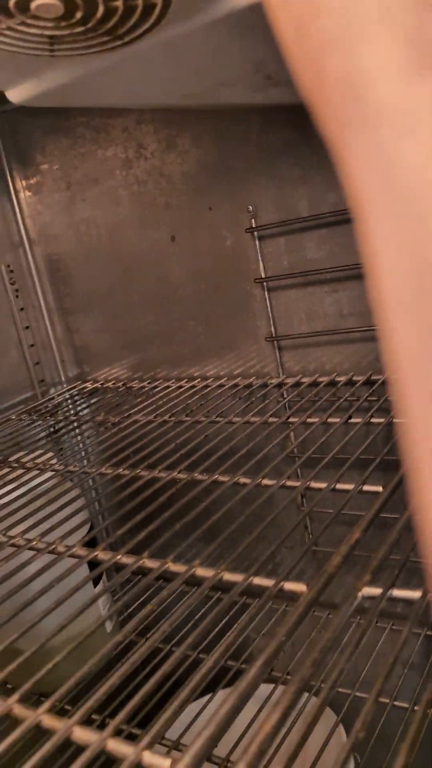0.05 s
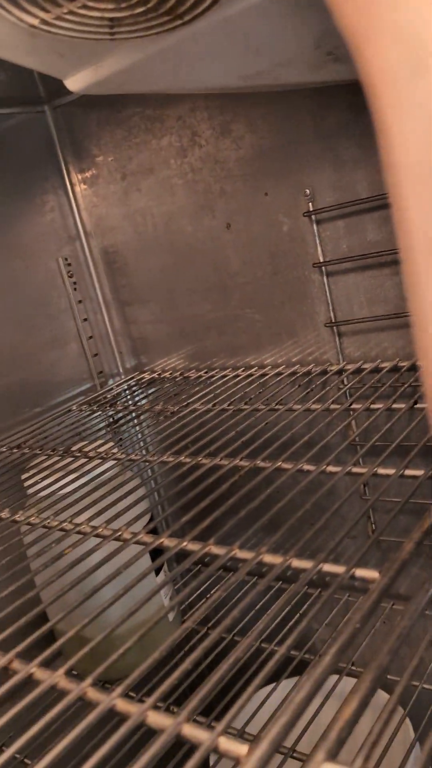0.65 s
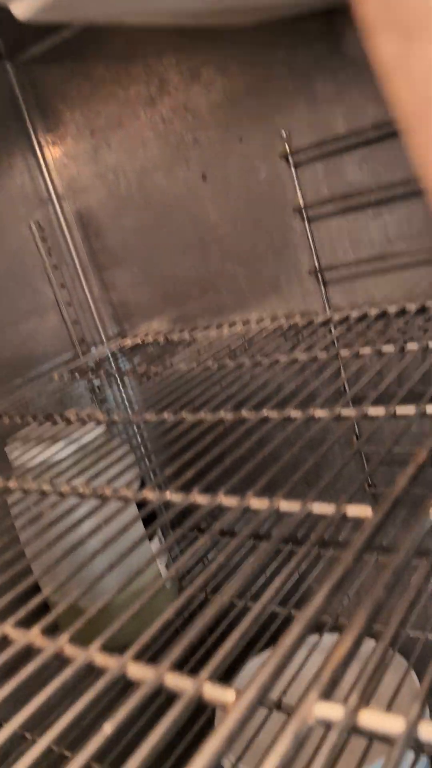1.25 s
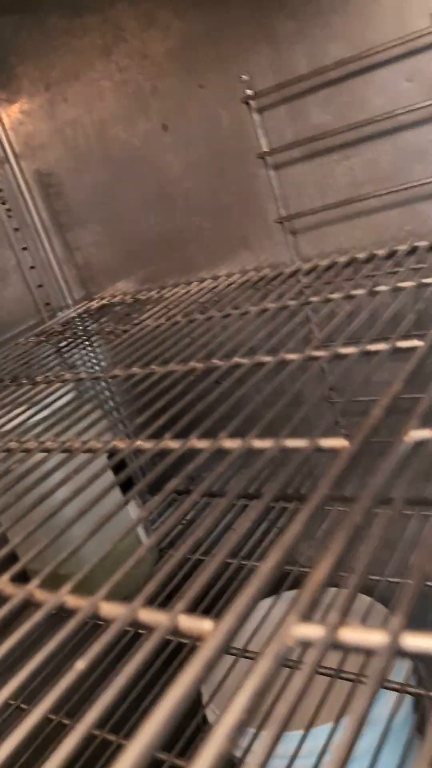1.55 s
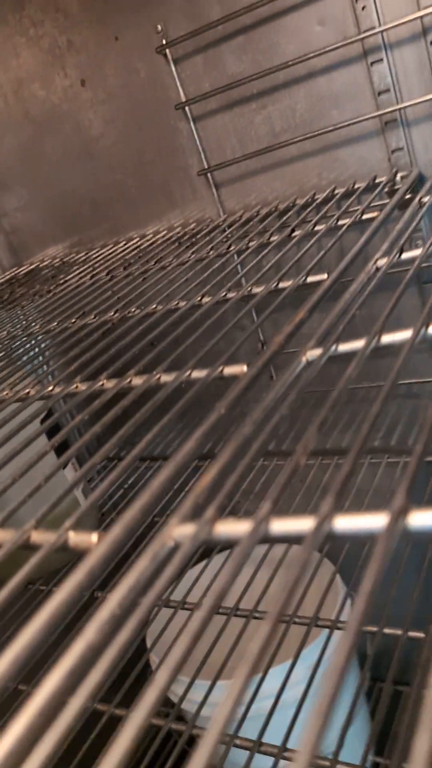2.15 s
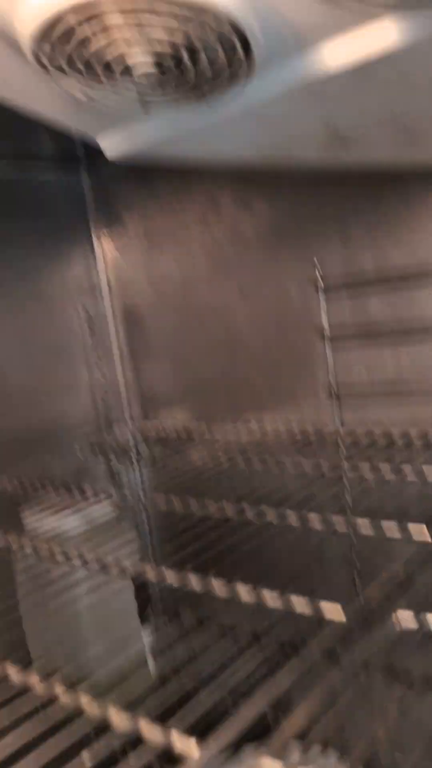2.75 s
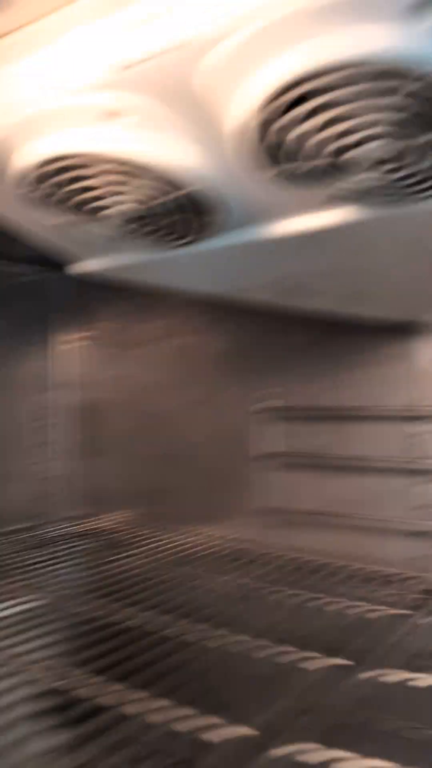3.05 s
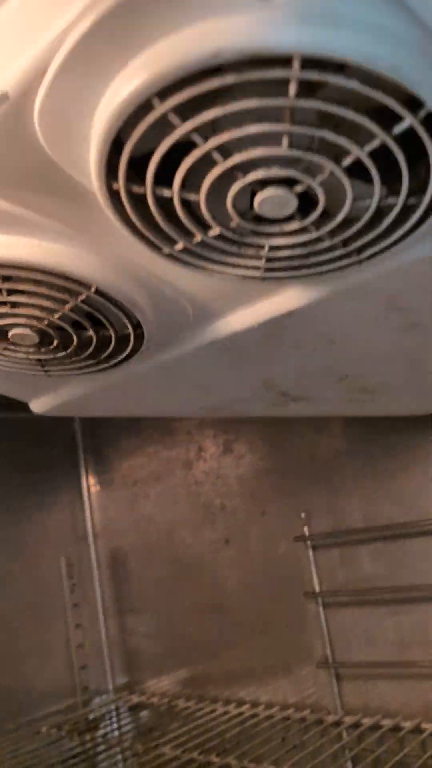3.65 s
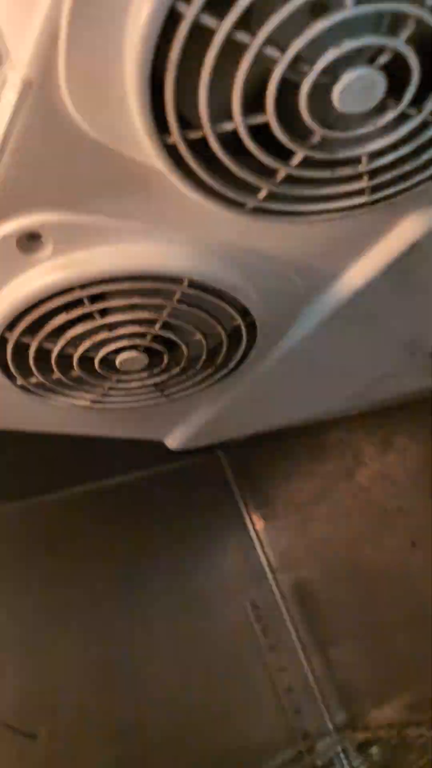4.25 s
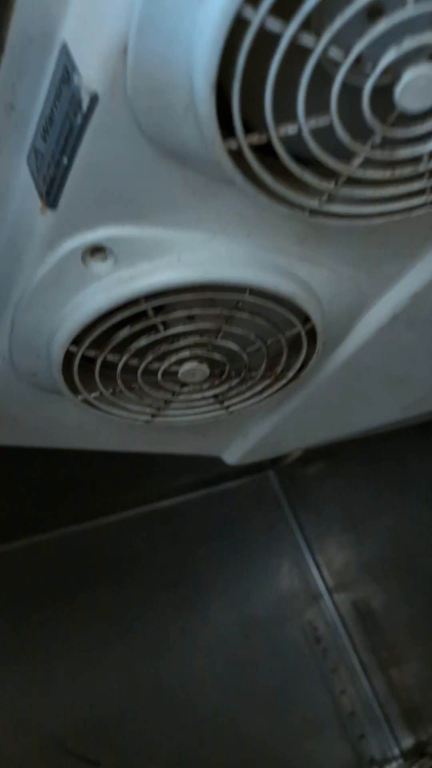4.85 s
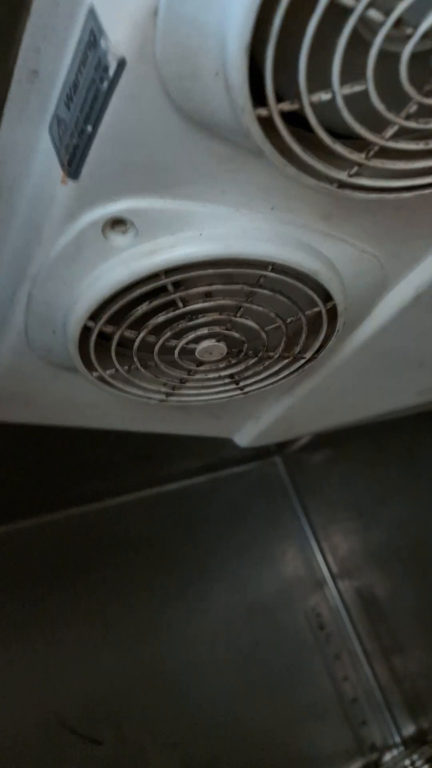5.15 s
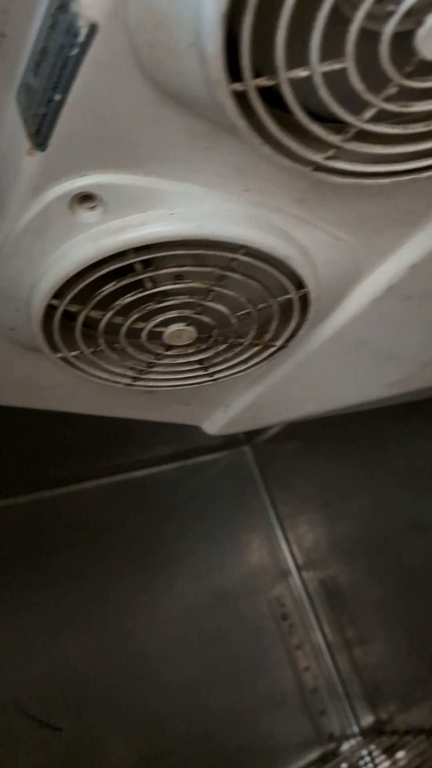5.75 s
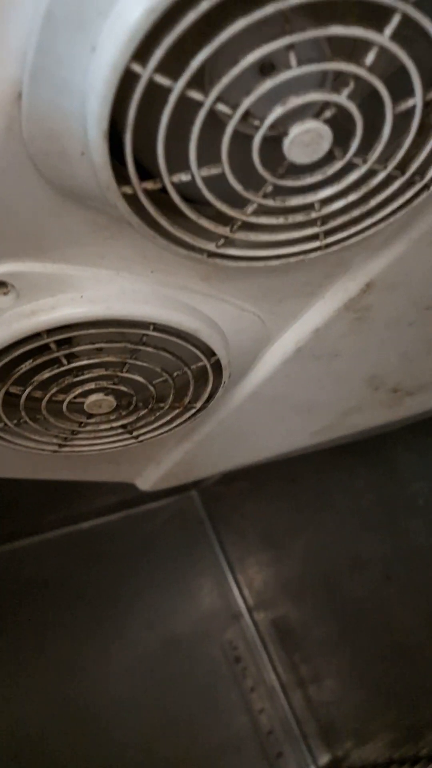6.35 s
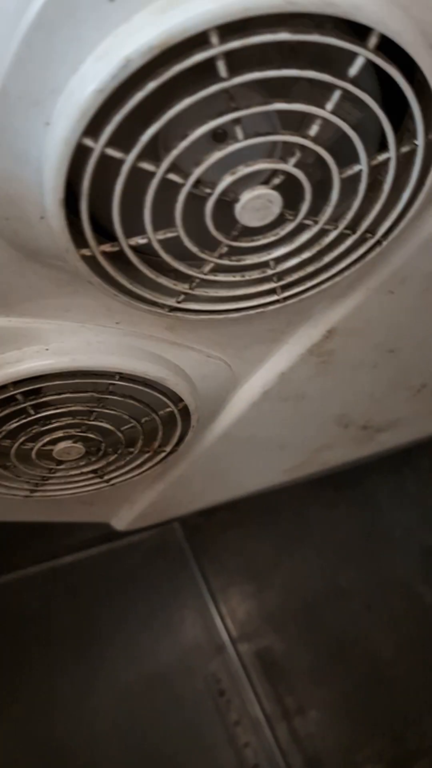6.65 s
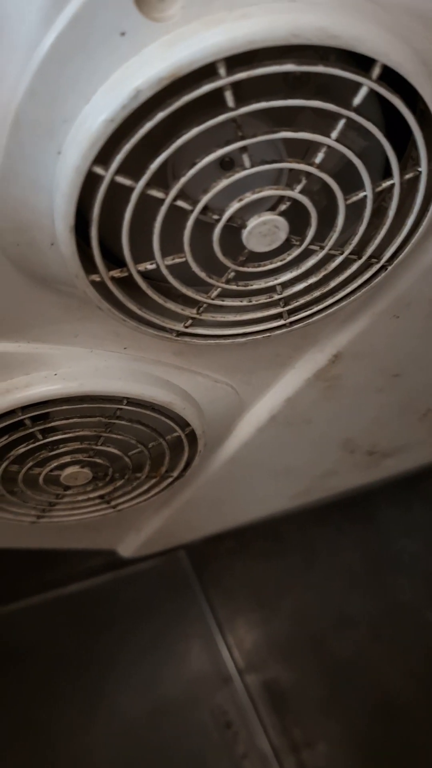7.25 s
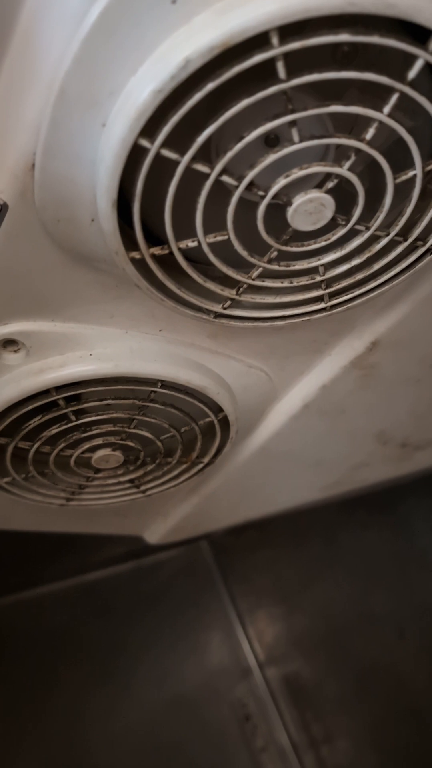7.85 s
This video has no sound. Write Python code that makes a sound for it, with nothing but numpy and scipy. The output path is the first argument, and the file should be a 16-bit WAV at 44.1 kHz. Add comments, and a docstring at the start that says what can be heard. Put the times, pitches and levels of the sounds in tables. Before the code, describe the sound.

A commercial freezer drones with a steady, gently pulsing hum, the microphone inside its small metal cabinet. One sharp click comes early, then soft brushes of a hand and light ticks. Then the fan starts with a gust, a short groan and a few dull knocks from the housing. It settles into a louder rush of air with a throbbing rumble and the fluttering hiss of its rotor brushing the casing.

```python
"""Inside a running steel commercial freezer. Its motors hum and beat against each other over a soft
wash of air. A sharp click and a few lighter ticks ring off the walls, among faint swishes of a hand.
Then a fan cuts in with a surge of air and some dull knocks: its unbalanced rotor shakes the housing
at the turning rate and brushes it once a turn, which makes a fluttering hiss."""
import sys
import numpy as np
from scipy import signal
from scipy.fft import rfft, irfft, next_fast_len
from scipy.io import wavfile

SR = 44100
rng = np.random.default_rng(int(sys.argv[2]) if len(sys.argv) > 2 else 0)


def generate_wav(sig):
    """Save sig (samples, or channels by samples) to the path in sys.argv[1] as 16-bit PCM at SR."""
    pcm = np.round(np.clip(np.atleast_2d(sig).T, -1, 1) * 32767).astype(np.int16)
    wavfile.write(sys.argv[1], SR, pcm)


N = 357205

# Levels are relative: each layer has its own trim. Balance is left minus right.
# Colours of the air bed: wash, treble, rumble, thin hiss (frequency [Hz], level [dB])
WASH_SPECTRUM = [(30, -102), (80, -79.5), (112, -68.5), (150, -75.5), (200, -76), (250, -69.5),
                 (300, -75.5), (350, -80.5), (410, -79), (640, -86.5), (800, -90), (1900, -100),
                 (3000, -110), (8000, -150)]
TREBLE_SPECTRUM = [(1200, -120), (2900, -105), (3900, -111), (4800, -109), (6200, -114), (7000, -126),
                   (10000, -128), (14500, -130), (16000, -136)]
RUMBLE_SPECTRUM = [(25, -102), (38, -94), (47, -74), (56, -71), (75, -76), (110, -103), (400, -170)]
THIN_HISS_SPECTRUM = [(7000, -160), (10000, -126), (10750, -109), (11800, -115), (13000, -123),
                      (16000, -131)]
# Level rides of the rumble and the air's treble (time [s], level [dB])
RUMBLE_RIDE = [(0.0, -64), (0.53, -55), (2.03, -54), (2.18, -65), (2.55, -66.5), (3.97, -43), (4.4, -51),
               (4.8, -47)]
TREBLE_RIDE = [(0.5, -69.5), (2.55, -73), (2.9, -69), (3.58, -75), (4.06, -70.5), (4.7, -75)]
# Swells of thin high hiss (time [s], length [s], level [dB])
THIN_HISS_SWELLS = [(1.254, .9, -4.5), (3.802, 0.8, 1)]
# Stereo width of the air (frequency [Hz], left-right correlation [ratio])
AIR_CORRELATION = [(108, 1), (130, 0.7), (290, 0.83), (640, 0.24), (1300, -0.07), (3000, 0), (15000, 0.4)]
# Panning of the air bed, and of the fan's air and the swishes (frequency [Hz], balance [dB])
BED_PAN = [(100, 6), (380, -2), (700, -0.5), (1300, -5.5), (2400, -3.5), (4400, -2.5), (9000, 3.5)]
DRAUGHT_PAN = [(60, -3), (200, 2.5), (380, 1), (700, -1.5), (1300, -4.5), (2400, 3), (8000, -19),
               (15000, -10.5)]

# Steady tones of the motors and of the fan (frequency [Hz], level [dB], balance [dB])
MOTOR_PARTIALS = [(104.2, -61, 2), (110.2, -61, 2), (116.04, -50, 1), (130.26, -48, 1), (173.2, -62, 2),
                  (245.2, -61, 0), (260.5, -46, 2), (406.1, -68, -3), (520.5, -70, 3)]
FAN_PARTIALS = [(102.7, -60, 6), (107.5, -51, 1), (161.1, -59, 7.5), (171, -53.5, 0), (191.8, -54.5, -1.5),
                (210, -62, 21), (221.5, -57, 6), (251, -62, -5), (266, -63, 2), (392.8, -48, -2.5)]
# Ride of the magnetic hum (time [s], level [dB], balance [dB])
HUM_RIDE = [(0.3, -37, 2), (2.18, -36.5, 3.0), (3.14, -36, 0), (4.8, -33.5, 1.5)]

# Soft brushes of a hand (time [s], length [s], level [dB], top-end offset [dB])
SWISHES = [(1.25, 0.2, -19, -18), (2.445, 0.019, -7, -19), (2.617, 0.032, -10, -5), (2.73, 0.038, -12, -3),
           (2.824, 0.051, -5.5, -8), (2.955, 0.043, -17, 15), (3.09, 0.016, -11, -3.5),
           (2.897, 0.61, -14.5, -8), (3.805, 0.031, -4, 0), (4.062, 0.13, -8, -13)]
# Colours of a swish's body and top end (frequency [Hz], level [dB])
SWISH_SPECTRUM = [(1500, -125), (4000, -110), (6500, -106), (9500, -111), (12500, -109), (14800, -107),
                  (16000, -110)]
SWISH_TOP_SPECTRUM = [(6000, -150), (10000, -120), (12500, -108), (14800, -104), (16000, -106)]
# Clicks and ticks (time [s], level [dB], brightness [dB])
CLICK_CUES = [(0.375, -5, -3), (1.2378, -28.5, 0), (3.147, -35, -13), (4.2051, -24.5, 7.5),
              (4.2804, -31, 2), (4.3892, -26, 5), (4.435, -39, 12), (5.958, -23, -6)]
# Resonances that a click rings (frequency [Hz], bandwidth [Hz], level [dB])
CLICK_RINGS = [(1110, 210, -2.5), (1580, 120, 2), (2030, 230, 4), (2510, 190, 0), (3030, 240, -5),
               (4700, 490, -4.5), (5860, 1600, -17.5)]
# Dull knocks of panels and housing (time [s], frequency [Hz], level [dB])
KNOCK_CUES = [(.402, 530, 15), (5.218, 560, 10), (5.485, 539, 9), (5.58, 800, 5.5), (5.687, 940, 2)]

# Colours of the fan's steady draught and its gusts (frequency [Hz], level [dB])
DRAUGHT_SPECTRUM = [(25, -85), (60, -74.5), (110, -70.5), (200, -72), (310, -67), (350, -76.5), (420, -72),
                    (590, -74), (720, -81.5), (1050, -83.5), (1600, -89.5), (2200, -96), (6000, -112),
                    (15000, -135)]
FAN_GUST_SPECTRUM = [(20, -57), (50, -43.5), (85, -53), (160, -58.5), (300, -59.5), (400, -62),
                     (500, -60.5), (620, -72), (750, -92), (1500, -100), (6000, -140)]
# Gusts of the fan (time [s], hold [s], level [dB])
GUST_CUES = [(5.132, .15, 0), (5.673, 0.019, -14), (7.763, .03, -11)]
# Overtones of the housing's start-up groan (harmonic [x turning rate], level [dB])
GROAN_HARMONICS = [(2, -41), (3, -36.5), (4, -45), (5, -41), (6, -47), (8, -56), (9, -36.5), (10, -61),
                   (12, -52.5)]
# Low tones that beat against the turning rate (frequency at full speed [Hz], level [dB])
THROB_TONES = [(58.07, -42.5), (46.99, -45.5)]
# Narrow rings of the fan housing (frequency [Hz], bandwidth [Hz], level [dB])
HOUSING_RINGS = [(2297, 34, 8.5), (2880, 90, -4), (3550, 58, -11), (4500, 39, -13), (5440, 66, 1),
                 (5870, 54, -16), (7070, 45, 2), (8100, 37, -6), (11800, 150, -5)]
# Colours of the rotor's hiss and its sizzling top (frequency [Hz], level [dB])
HISS_SPECTRUM = [(900, -4), (1900, -5.5), (2350, -1.5), (3000, 0), (3600, 1), (4700, -3.5), (5500, -3),
                 (6100, -1.5), (6700, -8), (9000, -19), (12000, -44)]
SIZZLE_SPECTRUM = [(5000, -23), (7200, -4), (8100, 2), (8900, -0.5), (10000, 2), (11200, 4), (12200, 2.5),
                   (12900, 0), (14700, -3), (15800, -8)]

HUM_HZ, COMPRESSOR_HZ, FAN_TURNS_HZ = 120.07, 57.65, 53.03
FAN_ON_S, SPIN_UP_S = 4.658, 0.13  # switch-on, and time constant of the run-up


def from_db(db):
    """Decibels to gain."""
    return 10 ** (np.asarray(db) / 20)


def unit_rms(x):
    """Scale to unit rms."""
    return x / np.sqrt(np.mean(x ** 2) + 1e-20)


def clock():
    """The time of every sample, in seconds."""
    return np.arange(N) / SR


def ride(rows):
    """Each dB column of a fader ride as a gain per sample."""
    times, *columns = np.transpose(rows)
    return [from_db(np.interp(clock(), times, db)) for db in columns]


def ramp(start_s, rise_s):
    """A straight fade-in."""
    return np.clip((clock() - start_s) / rise_s, 0, 1)


def gate(start_s, length_s, edge_s):
    """Opens for a while, with short ramps at both ends."""
    return ramp(start_s, edge_s) - ramp(start_s + length_s, edge_s)


def swell(peak_s, length_s):
    """A bell-shaped rise and fall."""
    return np.exp(-2 * ((clock() - peak_s) / length_s) ** 2)


def attack(full_s, attack_s):
    """Swells to full strength and stays there."""
    return np.where(clock() < full_s, swell(full_s, attack_s), 1)


def release(from_s, release_s):
    """Holds full strength, then dies away."""
    return np.exp(-np.maximum(clock() - from_s, 0) / release_s)


def surge(full_s, attack_s, hold_s, release_s):
    """Attack, hold and release."""
    return attack(full_s, attack_s) * release(full_s + hold_s, release_s)


def drift(rate_hz):
    """Smooth random modulation with a spread of one."""
    hop, run_in = 100, 1000
    pole = np.exp(-2 * np.pi * rate_hz * hop / SR)
    noise = rng.standard_normal(N // hop + run_in + 2)
    slow = signal.lfilter([1], [1, -2 * pole, pole * pole], noise)[run_in:]
    return np.interp(np.arange(N) / hop, np.arange(len(slow)), unit_rms(slow))


def pan(db):
    """Left and right gains for a balance."""
    return from_db(np.array([[.5], [-.5]]) * db)


def at_hz(curve, hz):
    """Read a curve on a log-frequency axis."""
    points_hz, values = np.transpose(curve)
    return np.interp(np.log(hz + 1), np.log(points_hz), values)


def equalise(x, spectrum):
    """Shape a sound with an EQ curve."""
    size = next_fast_len(N)
    eq = from_db(at_hz(spectrum, np.fft.rfftfreq(size, 1 / SR)))
    return irfft(rfft(x, size) * eq, size)[..., :N]


def resonance(x, hz, width_hz):
    """A two-pole resonance with unit gain at its peak."""
    r = np.exp(-np.pi * width_hz / SR)
    feedback = [1, -2 * r * np.cos(2 * np.pi * hz / SR), r * r]
    return signal.lfilter(np.array([1, 0, -1]) * (1 - r * r) / 2, feedback, x)


def air_noise(spectrum, balance):
    """Stereo turbulence, narrow in the bass and wide in the treble."""
    size = next_fast_len(N)
    hz = np.fft.rfftfreq(size, 1 / SR)
    mid, side = rfft(rng.standard_normal((2, size)))
    alike = np.clip(at_hz(AIR_CORRELATION, hz), -.5, .999)
    stereo = mid + np.sqrt((1 - alike) / (1 + alike)) * side * [[1], [-1]]
    shaped = stereo * pan(at_hz(balance, hz)) * from_db(at_hz(spectrum, hz))
    return irfft(shaped, size)[:, :N] * np.sqrt(SR / 2)


def tone(hz, waver):
    """A motor tone near unit rms that wavers a little in level and phase."""
    angle = 2 * np.pi * (hz * clock() + rng.random()) + waver * drift(1)
    return np.sqrt(2) * np.sin(angle) * (1 + waver * drift(3.3))


def tones(partials, waver):
    """A stack of motor tones, each with its own pan."""
    return sum(from_db(db) * pan(balance) * tone(hz, waver) for hz, db, balance in partials)


def wall_echoes(x, echo_db, count=14):
    """A few echoes between the steel walls comb the spectrum, differently on each side."""
    lags = (rng.uniform(.0015, .012, (2, count)) * SR).astype(int)
    echoes = [sum((-1) ** k * np.pad(side, (lag, 0))[:N] for k, lag in enumerate(side_lags))
              for side, side_lags in zip(x, lags)]
    send = from_db(echo_db)
    return (x + send * np.array(echoes) / np.sqrt(count)) / np.sqrt(1 + send ** 2)


def cabinet_reverb(x, t60, early_db, early_t60):
    """Steel walls: a bunch of early reflections and a short dense tail, different on each side."""
    t = np.arange(SR // 4) / SR
    decay = from_db(-60 * t / t60) + from_db(early_db - 60 * t / early_t60)
    echoes = rng.standard_normal((2, len(t))) * decay
    echoes /= np.sqrt(np.sum(echoes ** 2, axis=1, keepdims=True))
    return signal.fftconvolve(x[None], echoes, axes=1)[:, :N]


def drone_duck():
    """The drone ducks as the fan cuts in, and comes partly back once it is up to speed."""
    fan_on = ramp(start_s=4.92, rise_s=.06)
    starting = gate(start_s=4.92, length_s=.8, edge_s=.07)
    return from_db(-7.5 * fan_on - 7 * starting)


def air_bed(fade_db_per_s=0.19, treble_follow=0.29):
    """A receding wash of air that partly follows its treble, a rumble, and swells of thin hiss."""
    rumble_gain, = ride(RUMBLE_RIDE)
    treble_gain, = ride(TREBLE_RIDE)
    wash_gain = from_db(1.97 - fade_db_per_s * clock()) * unit_rms(treble_gain) ** treble_follow
    hiss_gain = sum(from_db(db) * swell(s, length) for s, length, db in THIN_HISS_SWELLS)
    wash = wash_gain * air_noise(WASH_SPECTRUM, BED_PAN)
    rumble = from_db(-5.5) * drone_duck() * rumble_gain * unit_rms(air_noise(RUMBLE_SPECTRUM, BED_PAN))
    treble = from_db(2.5) * treble_gain * unit_rms(air_noise(TREBLE_SPECTRUM, BED_PAN))
    hiss = hiss_gain * air_noise(THIN_HISS_SPECTRUM, BED_PAN)
    return wash + rumble + wall_echoes(treble + hiss, echo_db=-2)


def shelf_tones(whine_hz=649, ring_hz=2020, ring_width_hz=420):
    """A faint whine and an airy ring among the shelves; both fade away."""
    whine = from_db(-65.5) * release(from_s=1.2, release_s=1.1) * tone(whine_hz, waver=0.06)
    band = resonance(rng.standard_normal((2, N)), ring_hz, ring_width_hz)
    ring = unit_rms(resonance(band, ring_hz, ring_width_hz))
    return whine * pan(db=-5.5) + from_db(-69.5) * release(from_s=2.9, release_s=.4) * ring


def motors(fade_db_per_s=0.31):
    """Magnetic hum at twice the mains rate lies a few hertz from the motor tones, so the drone throbs."""
    hum_gain, left_over_right = ride(HUM_RIDE)
    rumble_gain, = ride(RUMBLE_RIDE)
    hum_pan = left_over_right ** np.array([[.5], [-.5]])
    hum = from_db(1.12) * hum_gain * hum_pan * tone(HUM_HZ, waver=0.12)
    compressor = from_db(1.2) * rumble_gain * tone(COMPRESSOR_HZ, waver=0.071)
    receding = from_db(-fade_db_per_s * clock()) * tones(MOTOR_PARTIALS, waver=0.034)
    return drone_duck() * (hum + compressor) + receding


def handling():
    """A hand brushes softly: faint bright swishes with a flickering level."""
    body_gain = top_gain = 0
    for s, length, db, top_db in SWISHES:
        touch = from_db(db) * swell(s, length)
        body_gain += touch
        top_gain += touch * from_db(top_db)
    body = body_gain * air_noise(SWISH_SPECTRUM, DRAUGHT_PAN)
    top = top_gain * air_noise(SWISH_TOP_SPECTRUM, DRAUGHT_PAN)
    return from_db(1.3 * drift(48)) * (body + top)


def knocks(width_hz):
    """Each dull knock rings one broad resonance of a panel, with no bright edge."""
    thuds = 0
    for s, hz, db in KNOCK_CUES:
        push = from_db(db) * (np.arange(N) == round(s * SR)) + 1e-18
        thuds += resonance(resonance(push, hz, width_hz), hz, width_hz)
    return cabinet_reverb(thuds, t60=0.21, early_db=-12, early_t60=0.044)


def clicks(body_db, crack_db):
    """Hard little contacts: a ringing body and a bright crack, heard dry and then off the walls."""
    blows, cracks = np.full((2, N), 1e-18)
    for s, db, bright_db in CLICK_CUES:
        blows[round(s * SR)] = from_db(db + body_db)
        cracks[round(s * SR)] = from_db(db + bright_db + crack_db)
    body = sum((-1) ** k * from_db(db) * resonance(blows, hz, width)
               for k, (hz, width, db) in enumerate(CLICK_RINGS))
    direct = body + signal.sosfilt(signal.butter(1, 3000, "high", fs=SR, output="sos"), cracks)
    echoes = cabinet_reverb(direct, t60=0.11, early_db=-4, early_t60=0.031)
    return (from_db(-5) * direct + echoes) * pan(db=-1.5)


def fan_air():
    """The fan's steady draught, tones that bloom as it comes up to speed, and gusts on top."""
    singing = from_db(0.4) * attack(full_s=5.83, attack_s=0.96) * tones(FAN_PARTIALS, waver=0.11)
    draught_gain = from_db(0.5) * attack(full_s=5.195, attack_s=0.51)
    draught = draught_gain * air_noise(DRAUGHT_SPECTRUM, DRAUGHT_PAN)
    gust_gain = sum(from_db(db) * surge(s, attack_s=0.17, hold_s=hold, release_s=0.21)
                    for s, hold, db in GUST_CUES)
    return draught + singing + gust_gain * air_noise(FAN_GUST_SPECTRUM, DRAUGHT_PAN)


def fan_housing(turns, throb_peak_s=6.835):
    """The unbalanced rotor shakes the housing, which lurches and groans at first; nearby tones throb."""
    lurch = surge(full_s=5.22, attack_s=0.23, hold_s=0.23, release_s=0.095)
    shake = (from_db(-30) + from_db(-22) * lurch) * np.sin(2 * np.pi * turns)
    for hz, db in THROB_TONES:
        beats = (hz - FAN_TURNS_HZ) * (clock() - throb_peak_s)
        shake += from_db(db) * np.sin(2 * np.pi * (turns + beats))
    groan = 0
    for harmonic, db in GROAN_HARMONICS:
        gain = from_db(db + 2 * drift(9.3))
        groan += gain * np.sin(2 * np.pi * (harmonic * turns + rng.random()) + 0.41 * drift(5.1))
    groan_gain = from_db(0.5) * surge(full_s=5.12, attack_s=0.089, hold_s=0.024, release_s=0.18)
    return np.sqrt(2) * (ramp(start_s=4.925, rise_s=0.052) * shake + groan_gain * groan)


def brushing_gains(full_s):
    """The rotor brushes hard, settles, and lets up once, briefly; the sizzle enters after the hiss."""
    pressing = release(full_s, release_s=0.31)
    dip_db = 5 * gate(start_s=7.42, length_s=.115, edge_s=0.023)
    hiss = attack(full_s, attack_s=0.22) * from_db(-57 + 3 * pressing - dip_db)
    sizzle = attack(full_s, attack_s=0.13) * from_db(-65 + 8 * pressing - dip_db)
    return hiss, sizzle


def fan_rotor(turns):
    """Once a turn the rotor brushes its housing: a burst of hiss that jumps up, rings and falls back."""
    turn, phase = np.floor(turns).astype(int), turns % 1
    force = from_db(0.44 * rng.standard_normal(turn.max() + 2))[turn]
    burst = from_db(np.interp(phase, [0, .04, .4, 1], [-12, 0, -7, -12]))
    friction = wall_echoes(force * burst * rng.standard_normal((2, N)), echo_db=-6)
    rings = sum(from_db(db) * resonance(friction, hz, width) for hz, width, db in HOUSING_RINGS)
    hiss_gain, sizzle_gain = brushing_gains(full_s=5.053)
    hiss = hiss_gain * unit_rms(equalise(friction + rings, HISS_SPECTRUM))
    sizzle = sizzle_gain * unit_rms(equalise(friction + rings, SIZZLE_SPECTRUM))
    return (hiss + sizzle) * pan(db=1.0)


def scene():
    """The full cabinet mix; the fan runs up to its speed on an exponential curve."""
    speed_hz = FAN_TURNS_HZ * (1 - release(FAN_ON_S, SPIN_UP_S))
    turns = np.cumsum(speed_hz) / SR
    fan = fan_air() + fan_housing(turns) + fan_rotor(turns)
    contacts = clicks(body_db=9, crack_db=-12.5) + knocks(width_hz=160)
    return motors() + air_bed() + shelf_tones() + handling() + contacts + fan


def record(dry):
    """A steep high cut at 15.8 kHz."""
    return signal.sosfilt(signal.ellip(12, .1, 90, 15800, fs=SR, output="sos"), dry)


dry = scene()
out = record(dry)
generate_wav(out)
```